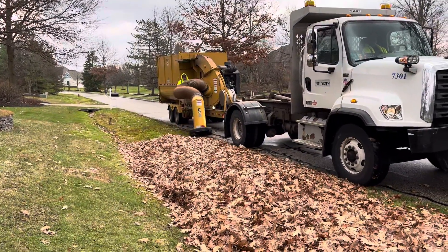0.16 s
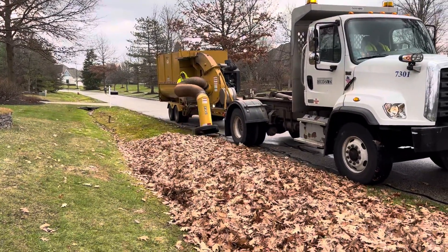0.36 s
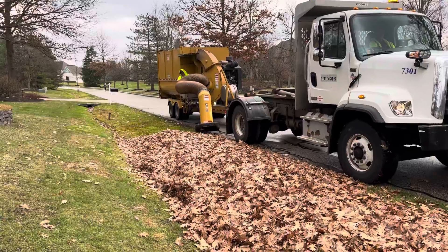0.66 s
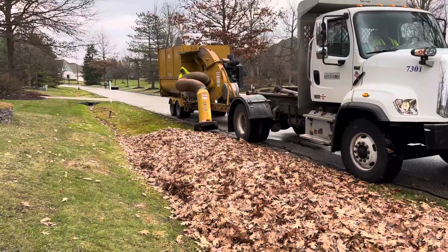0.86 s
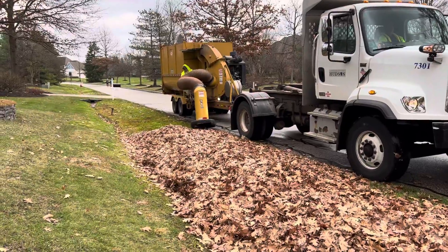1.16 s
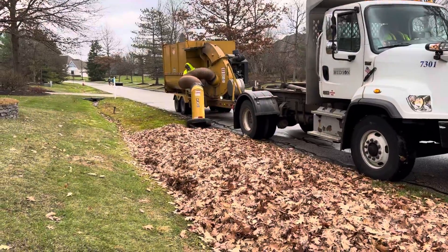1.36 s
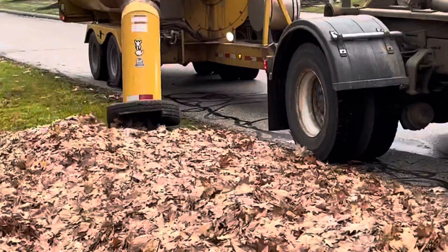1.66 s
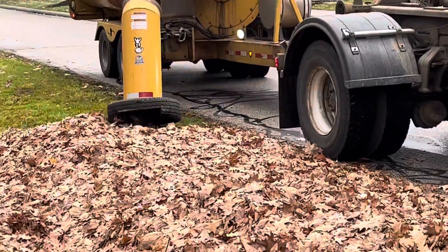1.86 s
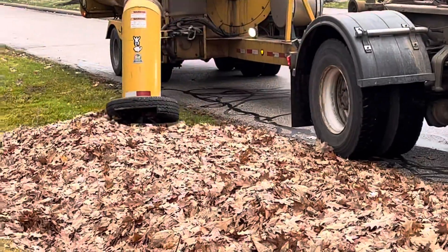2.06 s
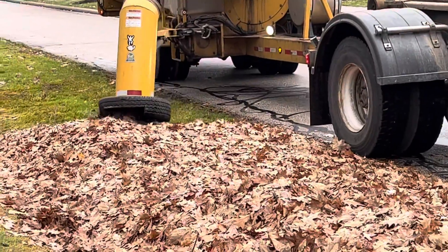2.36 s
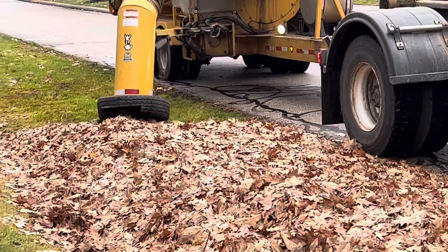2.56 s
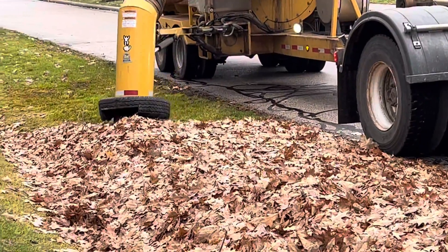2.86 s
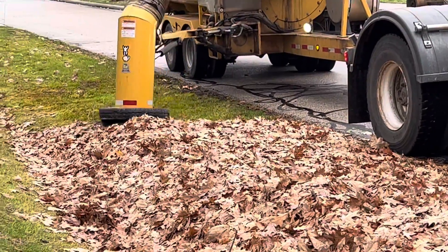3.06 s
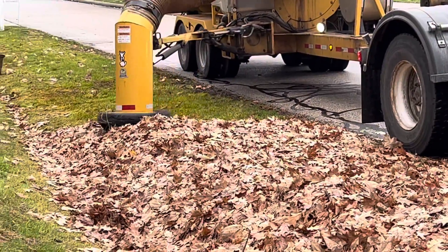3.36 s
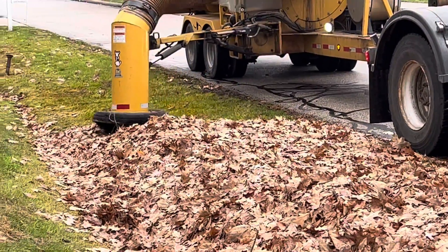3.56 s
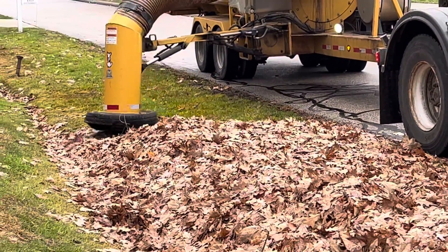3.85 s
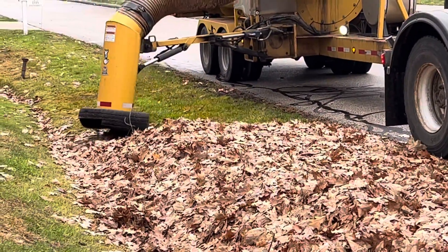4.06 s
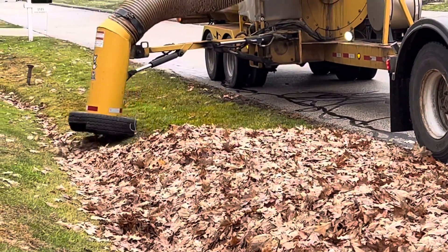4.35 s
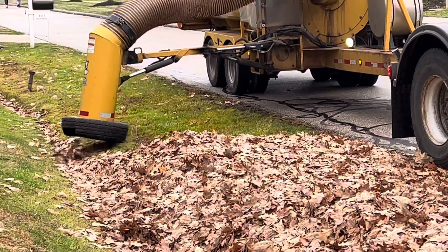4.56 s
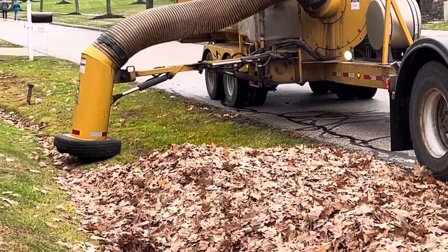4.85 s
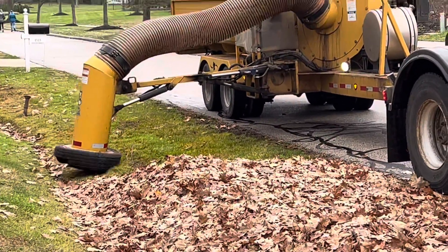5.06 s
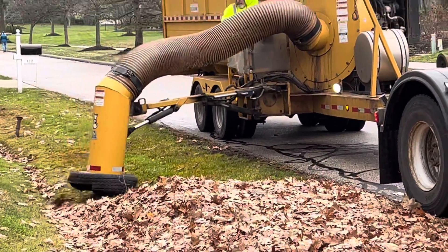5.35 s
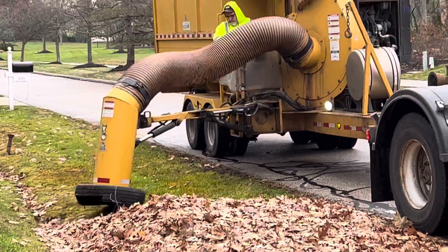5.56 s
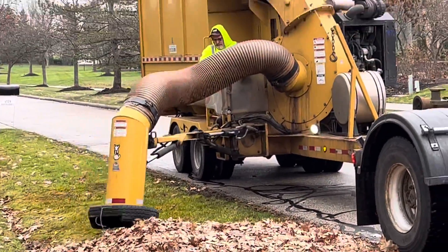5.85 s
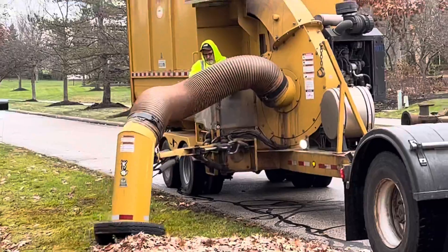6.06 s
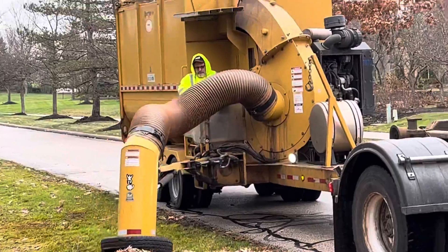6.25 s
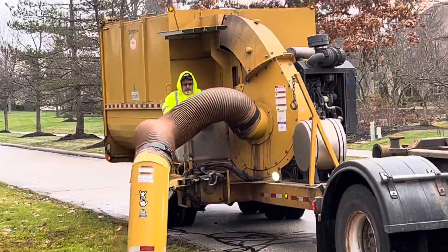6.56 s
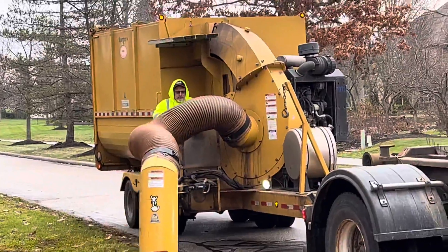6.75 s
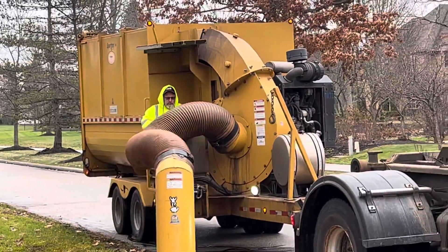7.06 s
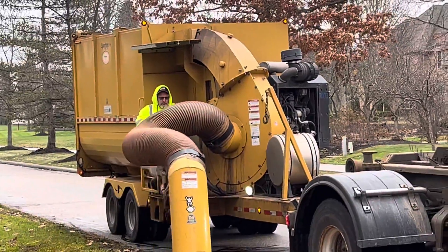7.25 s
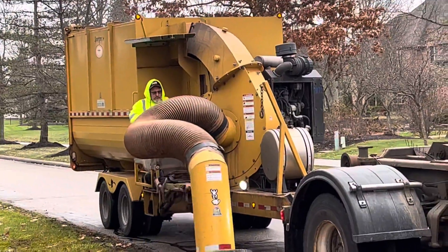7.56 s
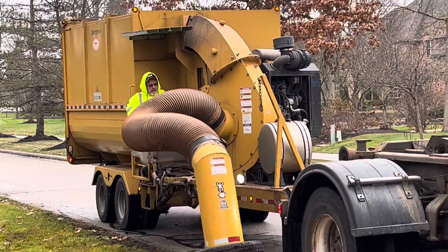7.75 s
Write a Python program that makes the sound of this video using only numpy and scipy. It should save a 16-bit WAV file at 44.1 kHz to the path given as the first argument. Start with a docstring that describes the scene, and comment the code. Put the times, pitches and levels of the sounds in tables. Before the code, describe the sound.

A trailer leaf vacuum runs at full power beside a street for about eight seconds. Its engine and fan hold a loud, deep, steady drone, with air rumbling and roaring and dry leaves constantly hissing and crackling up the hose. Thin, very high whistles stutter and slide over the first 2.5 seconds. At about 1.5 seconds the sound narrows from wide to centred. Between 2.2 and 3 seconds, clumps of leaves surge through with quick, crunchy knocks in the steel duct, and the drone sags very slightly. Scattered knocks follow, the sharpest near 6.6 seconds. A soft, breathy howl grows at the nozzle from about 3.5 seconds. Wind rumbles on the microphone from 4 seconds, thumping hardest around 5.1 and 7.3 seconds and momentarily swallowing the drone. A high hiss and faint whistle return near 7 seconds. The bass drops at about 7.4 seconds while the machine keeps running.

```python
"""A trailer leaf vacuum runs flat out beside a street, its hose swinging over a heap of dry leaves.
Engine and impeller drone at multiples of the shaft rate. Air rumbles in the hose, roars in the fan
housing, howls at the nozzle and whistles thinly. Leaves hiss and crackle, twigs knock in the duct.
The microphone pair starts wide, narrows on the machine, and catches gusts of wind."""
import sys
import numpy as np
from scipy import signal
from scipy.fft import rfft, irfft
from scipy.io import wavfile
from scipy.ndimage import uniform_filter1d, minimum_filter1d

SR = 44100
rng = np.random.default_rng(int(sys.argv[2]) if len(sys.argv) > 2 else 0)


def pcm_store(signal):
    """Save signal as 16-bit PCM."""
    levels = np.round(np.clip(np.atleast_2d(signal), -1, 1) * 32767)
    wavfile.write(sys.argv[1], SR, levels.astype(np.int16).T)


N = 348384
TIME_S = np.arange(N) / SR
NARROW_AT_S = 1.45

# drone pitch, two beats a shaft turn, sagging under load: t/s, f/Hz
DRONE_HZ = [(0.0, 68.45), (2.22, 68.26), (2.5, 67.03), (2.85, 68), (3.15, 66.87), (3.5, 67.9), (4.5, 68.44),
            (5.63, 67.9), (7.2, 67.94)]
# brief moments when wind on the microphone swallows the drone: t/s, gain/dB
WIND_DIPS = [(.417, -7), (.544, -6), (1.307, -7), (5.146, -14), (5.268, -20), (5.479, -8), (5.838, -12),
             (6.16, -14), (6.277, -11), (6.945, -6), (7.196, -16), (7.358, -26), (7.643, -19), (7.76, -14)]
# engine tones: shaft order, level/dB
ENGINE_ORDERS = [(3, -42), (4, -35.5), (10, -42), (11, -37.5), (13, -39), (14, -39), (16, -41.5),
                 (17, -48.5), (18, -49), (28, -50.5)]
# sixth-order hum: t/s, level/dB
HUM_DB = [(0, -30.5), (1.2, -42), (2.8, -30), (3.25, -35.5), (4.3, -27), (5.1, -38.5), (6.6, -23),
          (7.3, -40.5)]
# impeller blade tone and its octave: shaft order, level/dB
BLADE_ORDERS = [(12, -35.8), (24, -46.5)]

# noise spectra: f/Hz, relative density/dB
HOSE_SPECTRUM = [(20, -42), (36, -36), (52, -7), (80, 8.5), (145, 5), (185, -2.5), (280, -9), (500, -40)]
HOUSING_SPECTRUM = [(40, -5), (150, -2), (300, -2), (390, 3), (520, 0.5), (650, -6.5), (780, -7.5),
                    (1200, -8), (1450, -10), (2200, -18), (5000, -23.5), (15000, -79)]
HOWL_SPECTRUM = [(700, -52), (890, -2), (965, 0), (1030, -11.5), (1250, -31.5)]
RUSH_SPECTRUM = [(400, -4.5), (1100, -3.5), (1900, 0), (3100, 1.5), (4200, -2.5), (5500, -4), (7000, -8.5),
                 (9000, -9.5), (15000, -109)]
FIZZ_SPECTRUM = [(4000, -20), (7000, -8), (7900, 1.5), (9500, 3.5), (10500, 2), (12000, -2), (15500, -6)]
HISS_SPECTRUM = [(6000, -40), (7100, -14), (7800, 0), (8700, 0), (9500, -5), (11500, -14), (14000, -35)]
WIND_SPECTRUM = [(15, -48), (32, -21), (48, 5.5), (110, -1.5), (190, -3.5), (320, -13), (600, -22.5),
                 (1500, -58), (4000, -67)]
# noise envelopes before modulation: t/s, level/dB
HOUSING_DB = [(0.0, -25), (1.38, -25.5), (5.0, -23.5), (6.1, -25), (7.9, -26)]
HOWL_DB = [(3.3, -41), (3.5, -37), (4.55, -35.5), (6.9, -39), (7.4, -49), (7.75, -34)]
RUSH_DB = [(0.0, -34), (1.41, -32), (2.2, -30.5), (2.55, -33), (4.4, -29), (5.3, -32), (7.55, -32.5),
           (7.9, -30)]
FIZZ_DB = [(0.0, -43), (1.78, -42.5), (3.32, -45), (4.25, -41), (5.74, -47.5), (6.38, -48), (6.84, -42.5),
           (7.9, -43)]
HISS_DB = [(0, -54), (2.0, -46), (3.2, -48), (6.1, -56), (6.7, -41.5), (7.9, -42)]

# leaf clumps pulled up the hose: peak t/s, build-up/s, gain/dB
CLUMPS = [(.42, 0.27, 2), (2.29, 0.077, 4), (2.97, 0.18, 3.5), (4.25, 0.17, 2), (5.08, 0.075, 3),
          (5.73, 0.09, 2.5), (6.85, 0.15, 2), (7.75, 0.062, 4)]
# gusts on the microphone: peak t/s, half-width/s, level/dB
GUSTS = [(.2, 0.42, -31), (3.97, 0.093, -22), (4.7, 0.59, -20.5), (5.13, 0.28, -12.5), (5.7, 0.46, -18.5),
         (6.5, 1, -20), (7.31, 0.12, -13.5), (7.8, 0.093, -20.5)]
# main whistle, pitch: t/s, f/Hz
SQUEAL_HZ = [(.03, 7340), (.5, 7710), (.8, 7800), (1.7, 7762), (2.33, 7845)]
# main whistle, envelope: t/s, level/dB
SQUEAL_DB = [(.1, -48), (.15, -34.5), (.68, -38.5), (.78, -34.5), (.9, -49), (1.14, -38), (1.4, -41),
             (1.59, -34), (1.9, -35), (2.33, -49)]
# main whistle, breaks: t/s
SQUEAL_BREAKS_S = [.22, .365, .455, .585, 1.685]
# lesser whistles: start t/s, length/s, first f/Hz, last f/Hz, peak level/dB
GLIDES = [(.72, 1.5, 9700, 9860, -38.5), (1.98, .3, 9110, 9150, -41), (2.2, .18, 9130, 9220, -31),
          (2.37, .055, 8800, 8840, -35.5), (6.97, 1.3, 9850, 9800, -38.5)]
# twigs and clumps striking the duct: t/s, level/dB, t60/s, clatter f/Hz
KNOCKS = [(2.227, -22, .14, 1900), (2.291, -20.5, .13, 1900), (2.346, -28, .1, 3600),
          (2.391, -25.5, .08, 4000), (2.975, -29, .25, 2200), (3.026, -24, .12, 900),
          (3.771, -24.5, .12, 1200), (4.223, -22, .055, 3600), (5.078, -23, .14, 3300),
          (5.236, -27, .18, 3800), (6.570, -17.8, .065, 2100), (6.846, -23.8, .13, 3400)]
# eddies within the gusts: t/s, level/dB, centre f/Hz
BUFFETS = [(4.992, -20, 294), (5.048, -15.5, 200), (5.118, -14, 140), (5.221, -15, 141), (7.24, -14.5, 185),
           (7.356, -12, 139), (7.382, -17, 257), (7.737, -26, 189), (7.802, -20, 270)]

# echoes off the truck's flank and the road: delay/s, signed gain
ECHOES = [(.0019, .15), (.00234, -.21)]
# wide pair: f/Hz, channel correlation, colour/dB, left minus right/dB
WIDE_PAIR = [(100, 0.96, 1, 0.5), (423, 1, -1, -2.5), (680, 0.57, 3, 0.5), (1290, 0.88, -0.5, 2.5),
             (2060, 0.49, 3.5, -6.5), (2920, -0.9, 0, -1.5), (4370, 1, -0.5, 8.5), (5300, 0.5, 2.5, 12),
             (6940, -0.58, 0, 6), (7800, 1, 1, 4), (14900, 1, -1, -2)]
# narrowed pair: f/Hz, channel correlation
NARROW_PAIR = [(100, .98), (420, .94), (700, .8), (1100, .93), (1500, 1), (7400, 1), (8500, .93)]
# phase between the microphone ports: f/Hz, left lead/rad
PORT_PHASE_RAD = [(7500, 0), (7750, -.7), (8600, -1.1), (9100, -2.6), (9600, -3.1), (10600, -3.2),
                  (11200, -4.1), (12200, -5.2), (12550, -2 * np.pi), (14400, -2 * np.pi), (15500, -8.5)]
# balance of the ports: f/Hz, left minus right/dB
PORT_BALANCE_DB = [(400, -.4), (700, -2), (1100, .2), (2400, 0)]


def amp(db):
    """Decibels to gain."""
    return 10 ** (np.asarray(db) / 20)


def unit(x):
    """Scales to rms 1."""
    return x / np.sqrt(np.mean(x ** 2) + 1e-20)


def curve(table, x=TIME_S):
    """Interpolates a two-column table, by default over time."""
    table = np.array(table)
    return np.interp(x, table[:, 0], table[:, 1])


def at_hz(table, hz, column=1):
    """Interpolates a column on a log-frequency axis."""
    table = np.array(table)
    return np.interp(np.log(hz + 1), np.log(table[:, 0] + 1), table[:, column])


def bell(at_s, half_width_s):
    """Gaussian swell of height 1."""
    return np.exp(-((TIME_S - at_s) / half_width_s) ** 2)


def add(mix, at_s, sound):
    """Mixes a sound in."""
    part = mix[round(at_s * SR):][:len(sound)]
    part += sound[:len(part)]


def noise(shape, spectrum):
    """White noise filtered by a spectrum in dB."""
    white = rng.standard_normal(shape)
    size = white.shape[-1]
    return irfft(rfft(white) * amp(at_hz(spectrum, np.fft.rfftfreq(size, 1 / SR))), size)


def wander(rate_hz, size=4096):
    """Smooth random drift of rms 1, rolling off above rate_hz."""
    hz = np.fft.rfftfreq(size, TIME_S[-1] / size)
    slow = irfft(rfft(rng.standard_normal(size)) / np.sqrt(1 + (hz / rate_hz) ** 4))
    return unit(np.interp(TIME_S, np.linspace(0, TIME_S[-1], size), slow))


def echo_comb(t, hz, narrow_gain=0.4, narrow_stretch=1.08, drift=0.025):
    """Close echoes comb the air noise; the narrowed pair hears them weaker, later and drifting."""
    wide = (t < NARROW_AT_S)[:, None]
    stretch = np.where(wide, 1, narrow_stretch + drift * np.interp(t, TIME_S, wander(0.37))[:, None])
    echoes = sum(gain * np.exp(-2j * np.pi * hz * delay_s * stretch) for delay_s, gain in ECHOES)
    return abs(1 + np.where(wide, 1, narrow_gain) * echoes)


def air(spectrum, patchy_db, fft_size):
    """Turbulent noise of rms 1 with drifting spectral patches, as the two ports hear it."""
    hop = fft_size // 4
    t = np.arange(N // hop + 6) * hop / SR
    hz = np.fft.rfftfreq(fft_size, 1 / SR)
    mid_re, mid_im, side_re, side_im, patches = rng.standard_normal((5, len(t), len(hz)))
    patches = unit(uniform_filter1d(uniform_filter1d(patches, size=12, axis=0), size=12, axis=1))
    wide = (t < NARROW_AT_S)[:, None]
    correlation = np.clip(np.where(wide, at_hz(WIDE_PAIR, hz), at_hz(NARROW_PAIR, hz)), -1, 1)
    mid = np.sqrt(1 + correlation) * (mid_re + 1j * mid_im)
    side = np.sqrt(1 - correlation) * (side_re + 1j * side_im)
    lean = amp(wide * at_hz(WIDE_PAIR, hz, column=3))
    bins = np.array([(mid + side) * lean, mid - side]) / np.hypot(lean, 1)
    colour_db = at_hz(spectrum, hz) + wide * at_hz(WIDE_PAIR, hz, column=2) + patchy_db * patches
    bins *= echo_comb(t, hz) * amp(colour_db)
    _, pair = signal.istft(bins, nperseg=fft_size, noverlap=fft_size - hop, time_axis=1, freq_axis=2)
    return unit(pair[:, :N])


def shaft_angle(jitter=0.0018):
    """Shaft angle in rad, slightly unsteady under load."""
    shaft_hz = curve(DRONE_HZ) / 2 * (1 + jitter * wander(6))
    return 2 * np.pi * np.cumsum(shaft_hz) / SR


def bass_drop_db(at_s=7.34, fall_s=0.11, depth_db=-8.5):
    """Near the end the bass drops away and stays low."""
    return depth_db * np.clip((TIME_S - at_s) / fall_s, 0, 1)


def drone(angle, base_db=-12, swell_db=1.6, flutter_db=0.4, sway_rad=0.11):
    """Deep beat, twice a turn, swelling once; wind on the microphone briefly swallows it."""
    dips_db = sum(db * bell(at_s, half_width_s=0.01) for at_s, db in WIND_DIPS)
    level_db = base_db + swell_db * bell(at_s=3.2, half_width_s=0.86) + dips_db + bass_drop_db()
    level = amp(level_db - flutter_db * wander(25))
    return np.sqrt(2) * level * np.cos(2 * angle + sway_rad * wander(10))


def engine(angle, waver_db=2.5, smear_rad=0.016):
    """Shaft orders waver in level and phase; the sixth swells and fades as a hum."""
    tones = np.zeros(N)
    for order, db in ENGINE_ORDERS:
        level = amp(db + waver_db * wander(4.2))
        unsteady = angle + smear_rad * wander(9)
        tones += level * np.cos(order * unsteady + 2 * np.pi * rng.random())
    hum = amp(curve(HUM_DB) + bass_drop_db()) * np.cos(6 * angle)
    return np.sqrt(2) * (tones + hum)


def blades(angle, waver_db=2.0, smear_rad=0.016):
    """Impeller blades pass the outlet in a hollow, wavering tone."""
    unsteady = angle + smear_rad * wander(6)
    tones = sum(amp(db + waver_db * wander(1.4)) * np.cos(order * unsteady) for order, db in BLADE_ORDERS)
    return np.sqrt(2) * tones


def throb(angle, depth):
    """Gain pulsing in step with the drone."""
    return 1 + depth * np.cos(2 * angle)


def hose(angle, base_db=-22.5, drop_share=0.99):
    """Air rumbles in the hose, throbbing and dropping away with the drone."""
    level = amp(base_db + drop_share * bass_drop_db())
    return air(HOSE_SPECTRUM, patchy_db=1.06, fft_size=2048) * level * throb(angle, depth=0.044)


def housing(angle):
    """Air roars in the fan housing, chopped in step with the drone."""
    roar = air(HOUSING_SPECTRUM, patchy_db=1.0, fft_size=1024)
    return roar * amp(curve(HOUSING_DB)) * throb(angle, depth=0.08)


def howl():
    """Air drawn over the nozzle excites a breathy resonance."""
    return air(HOWL_SPECTRUM, patchy_db=1.5, fft_size=1024) * amp(curve(HOWL_DB))


def clumps_db(clear_ratio=0.52):
    """Each clump builds up in the hose and clears faster."""
    return sum(db * bell(at_s, np.where(TIME_S < at_s, build_s, clear_ratio * build_s))
               for at_s, build_s, db in CLUMPS)


def leaves(angle, flicker_db=0.84, fizz_share=0.96):
    """Leaves scour the duct in clumps: a rush with fine fizz on top."""
    surge_db = clumps_db()
    rush = air(RUSH_SPECTRUM, patchy_db=1.42, fft_size=512) * amp(curve(RUSH_DB) + surge_db)
    fizz = air(FIZZ_SPECTRUM, patchy_db=4.0, fft_size=512) * amp(curve(FIZZ_DB) + fizz_share * surge_db)
    return (rush + fizz) * amp(flicker_db * wander(29)) * throb(angle, depth=0.017)


def crackle(snaps_per_s=500, spread_db=4, re_rush_db=-12.5, pitches=24):
    """Dry scraps snap against the duct wall, each a grain of a few cycles."""
    strength = amp(spread_db * np.minimum(rng.exponential(1, N), 4))
    snaps = strength * (rng.random(N) < snaps_per_s / SR)
    pitch_index = rng.integers(0, pitches, N)
    out, t = np.zeros(N), np.arange(256) / SR
    for index, hz in enumerate(np.geomspace(1600, 7500, pitches)):
        grain = np.sin(2 * np.pi * hz * t) * np.exp(-hz * t / 2)
        out += signal.oaconvolve(snaps * (pitch_index == index), grain)[:N]
    return unit(out) * amp(curve(RUSH_DB) + clumps_db() + re_rush_db)


def hiss():
    """Fast air hisses in a band around the whistles."""
    return air(HISS_SPECTRUM, patchy_db=3.5, fft_size=512) * amp(curve(HISS_DB))


def wind(breeze_db=-50, lump_db=3.0, width=0.69):
    """Lumpy gusts add their power to a light breeze, partly different at each port."""
    mid, side = noise((2, N), WIND_SPECTRUM)
    pair = unit(np.array([mid + width * side, mid - width * side]))
    gust_power = sum((amp(db) * bell(at_s, half_width_s)) ** 2 for at_s, half_width_s, db in GUSTS)
    lumps = unit(amp(lump_db * wander(16)))
    return pair * np.sqrt(amp(breeze_db) ** 2 + gust_power) * lumps


def whistle(hz, level, jitter_hz=11, flicker_db=2.0, octave_db=-14):
    """Thin, flickering tone of fast air with a weak octave."""
    phase = 2 * np.pi * np.cumsum(hz + jitter_hz * wander(49)) / SR
    tone = np.sin(phase) + amp(octave_db) * np.sin(2 * phase)
    return np.sqrt(2) * level * amp(flicker_db * wander(38)) * tone


def squeal(fade_s=0.035, break_db=-11):
    """The main whistle stutters, climbs and levels off."""
    start_s, end_s = SQUEAL_HZ[0][0], SQUEAL_HZ[-1][0]
    gate = np.clip(np.minimum(TIME_S - start_s, end_s - TIME_S) / fade_s, 0, 1)
    breaks_db = break_db * sum(bell(at_s, half_width_s=0.032) for at_s in SQUEAL_BREAKS_S)
    return whistle(curve(SQUEAL_HZ), gate * amp(curve(SQUEAL_DB) + breaks_db))


def glides():
    """Lesser whistles swell and fade as their pitch slides."""
    out = np.zeros(N)
    for start_s, length_s, first_hz, last_hz, db in GLIDES:
        progress = np.clip((TIME_S - start_s) / length_s, 0, 1)
        out += whistle(first_hz + (last_hz - first_hz) * progress, amp(db) * np.sin(np.pi * progress))
    return out


def knocks(low_db=-18, high_db=-9, crunch_db=3.0, crunch_hz=220, rise_share=0.033):
    """Short, crunchy knocks in the steel duct, each with a quick attack and decay."""
    out, t = np.zeros(N), np.arange(SR // 4) / SR
    for at_s, db, t60_s, hz in KNOCKS:
        duct = [(hz / 6, low_db), (hz / 2, 0), (hz, 0), (hz * 2, high_db), (hz * 6, 4 * high_db)]
        crunch = amp(crunch_db * unit(noise(len(t), [(crunch_hz, 0), (2 * crunch_hz, -60)])))
        rise_s = rise_share * t60_s
        envelope = np.minimum(t / rise_s, 1) * amp(db - 60 * np.maximum(t - rise_s, 0) / t60_s)
        add(out, at_s, unit(noise(len(t), duct) * crunch) * envelope)
    return out


def buffets(half_width_s=0.012, below_db=-22, above_db=-15, far_db=-56):
    """Eddies thump on the microphone in short bursts of low turbulence."""
    out, t = np.zeros(N), np.arange(-SR // 10, SR // 10) / SR
    envelope = np.exp(-(t / half_width_s) ** 2)
    for at_s, db, hz in BUFFETS:
        eddy = [(hz / 6, far_db), (hz / 2, below_db), (hz, 0),
                (hz * 2, above_db), (hz * 6, far_db), (hz * 20, 2 * far_db)]
        burst = noise(len(t), eddy) * envelope
        add(out, at_s + t[0], amp(db) * burst * np.linalg.norm(envelope) / np.linalg.norm(burst))
    return out


def scene():
    """The machine stands straight ahead; its air noise spreads around it."""
    angle = shaft_angle()
    machine = drone(angle) + engine(angle) + blades(angle)
    centre = machine + crackle() + knocks() + squeal() + glides() + buffets()
    return centre + hose(angle) + housing(angle) + howl() + leaves(angle) + hiss() + wind()


def record(dry):
    """Port mismatch in level and treble phase, peak limiter, low-pass."""
    ceiling, cutoff_hz = 0.93, 15750
    hz = np.fft.rfftfreq(N, 1 / SR)
    left_response = np.exp(0.5j * curve(PORT_PHASE_RAD, hz)) * amp(at_hz(PORT_BALANCE_DB, hz) / 2)
    pair = irfft(rfft(dry) * np.array([left_response, 1 / left_response]), N)
    allowed_gain = ceiling / np.maximum(abs(pair).max(axis=0), ceiling)
    limited = pair * uniform_filter1d(minimum_filter1d(allowed_gain, size=401), size=401)
    lowpass = signal.firwin(511, cutoff_hz, window=("kaiser", 9), fs=SR)
    return signal.oaconvolve(limited, lowpass[None], "same")


dry = scene()
out = record(dry)
pcm_store(out)
```